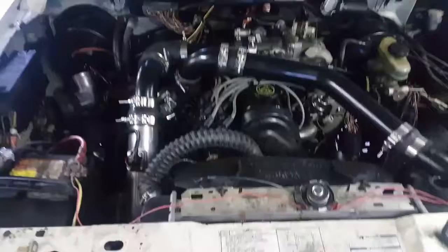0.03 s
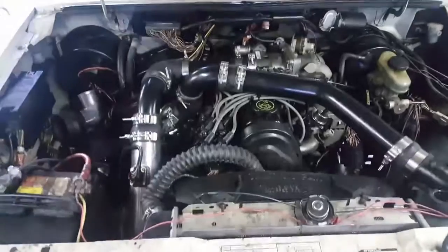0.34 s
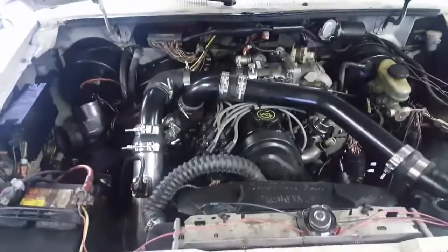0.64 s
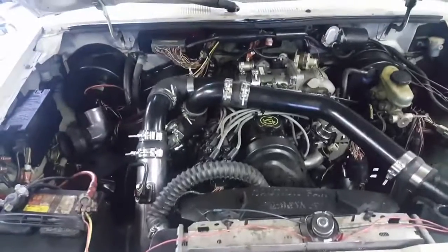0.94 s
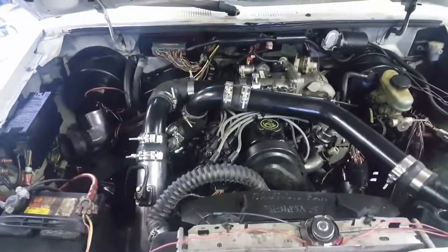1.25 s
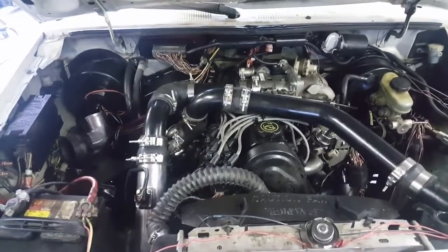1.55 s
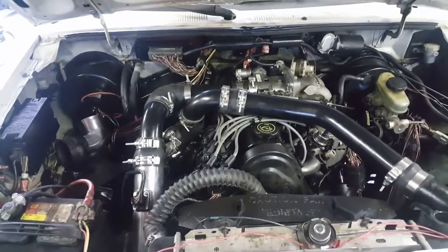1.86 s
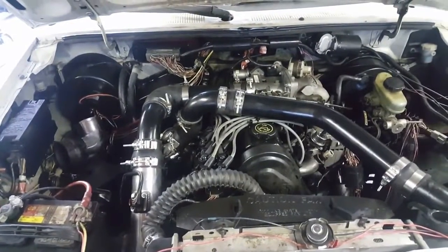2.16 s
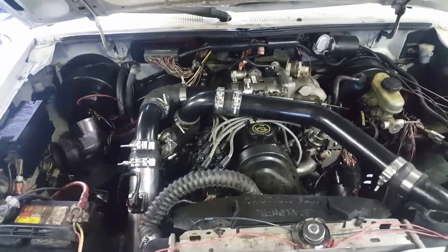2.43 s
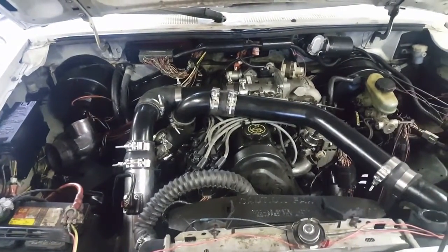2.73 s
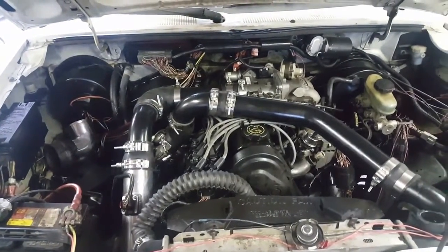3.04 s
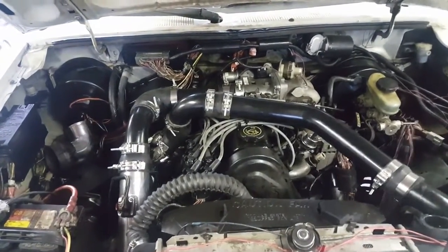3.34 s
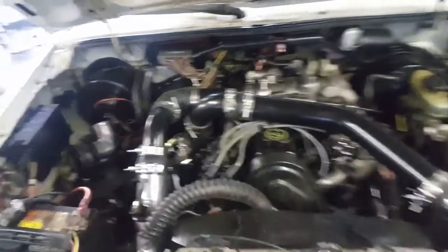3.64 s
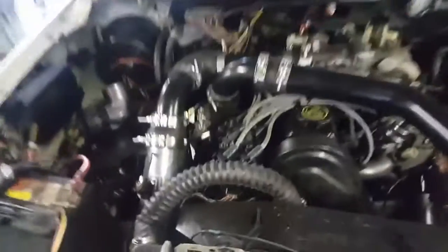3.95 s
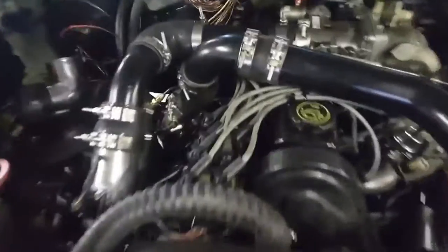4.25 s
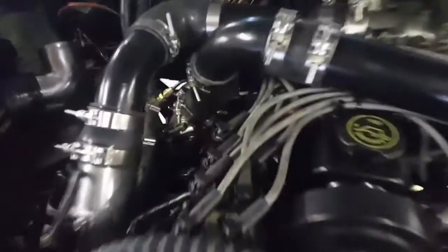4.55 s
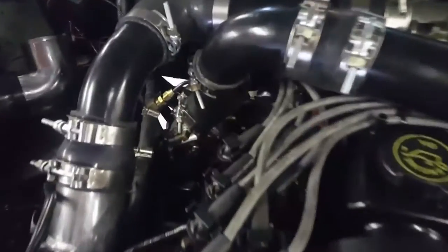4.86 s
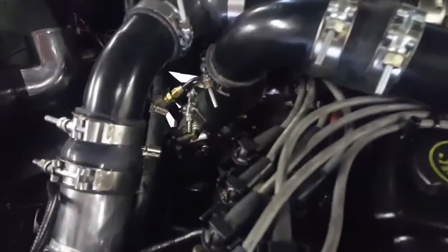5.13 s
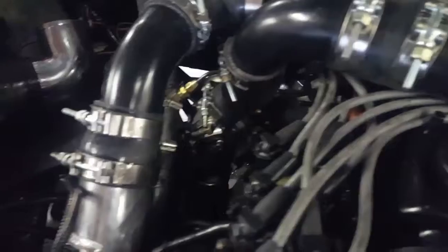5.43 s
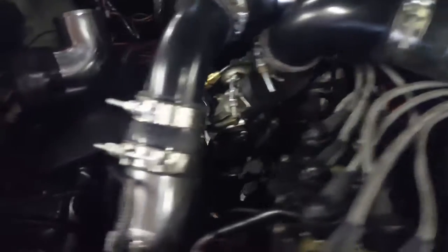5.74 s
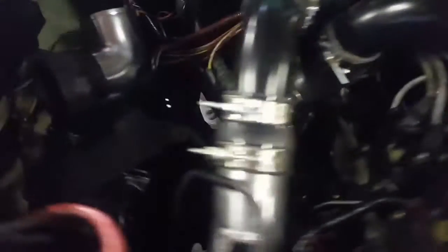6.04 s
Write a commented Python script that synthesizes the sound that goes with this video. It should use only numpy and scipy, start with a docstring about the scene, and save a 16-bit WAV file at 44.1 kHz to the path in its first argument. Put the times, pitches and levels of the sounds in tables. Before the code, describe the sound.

A rough four-cylinder car engine idles in a garage with a booming, loping exhaust and ticking clatter, its revs rising slightly late on.

```python
"""The exhaust of a rough-running four-cylinder engine booms as its idle speed hunts in a garage.
Periodic gas pulses sound mainly the 2nd and 3rd harmonics of the firing rate and lope at each misfire.
Each firing puffs gas and rings the block and the open bay, while the valves tick. One cylinder is weak,
and after a miss the next catches with a chuff. Late on the revs rise and the microphone leans in,
so that the clatter takes on the resonances heard close above the engine."""
import sys
import numpy as np
from scipy import signal
from scipy.fft import rfft, irfft
from scipy.io import wavfile
from scipy.ndimage import uniform_filter1d, minimum_filter1d

SR = 44100
rng = np.random.default_rng(int(sys.argv[2]) if len(sys.argv) > 2 else 0)


def put_to_file(sound):
    """Save the sound as 16-bit audio at rate SR, in the file named by the first command-line argument."""
    columns = np.atleast_2d(sound).T  # one column per channel
    safe = np.clip(columns, -1, 1)
    whole_steps = np.round(safe * 32767)
    wavfile.write(sys.argv[1], SR, whole_steps.astype(np.int16))


N = 268569
TIME = np.arange(N) / SR
RESPONSE_SIZE = 2 ** 14  # samples in an impulse response
IDLE_HZ = 41

# firings that catch after a miss: (time [s], relative chuff level [dB])
CATCH_EVENTS = [(0.636, -28.5), (0.736, -24), (0.855, -31), (1.014, -26), (1.083, -19), (1.1308, -23),
                (1.3382, -21), (1.481, -20), (1.5738, -26), (1.6752, -21.5), (1.7309, -20.5), (1.8019, -25),
                (1.8782, -25), (1.948, -21.5), (2.1, -20.5), (2.178, -20), (2.303, -21.5), (2.473, -19),
                (3.2114, -32), (3.3069, -25.5), (3.5775, -25), (3.6913, -23.5), (3.7655, -24),
                (3.8823, -21.5), (3.9585, -26), (4.0294, -21.5), (4.215, -22), (4.3268, -21.5),
                (4.395, -24), (4.6538, -25), (5.472, -26), (5.9, -24)]
CATCH_S, CATCH_DB = np.transpose(CATCH_EVENTS)


def undb(db):
    """Decibel law: 20 dB is a tenfold amplitude."""
    return 10 ** (np.asarray(db) / 20)


def unit(x):
    """Normalisation to an rms of 1."""
    return x / np.sqrt(np.mean(x ** 2))


def curves(table):
    """Linear interpolation of each column of a time table to every sample."""
    times, *columns = np.transpose(table)
    return [np.interp(TIME, times, column) for column in columns]


def through(x, response):
    """Convolution: a linear system answers each sample with its impulse response."""
    return signal.fftconvolve(np.atleast_2d(x), np.atleast_2d(response), axes=-1)[:, :N]


def colour(hz, db):
    """Minimum phase: folding the cepstrum gives a causal response with the given spectrum."""
    bins_hz = np.fft.rfftfreq(RESPONSE_SIZE, 1 / SR)
    gain = undb(np.interp(np.log(bins_hz + 1), np.log(hz), db))
    cepstrum = irfft(np.log(gain))
    cepstrum[1:RESPONSE_SIZE // 2] *= 2
    cepstrum[RESPONSE_SIZE // 2 + 1:] = 0
    return irfft(np.exp(rfft(cepstrum)))


def ring(modes):
    """Modal superposition: damped sinusoids sum to an impulse response of energy 1."""
    t = TIME[:RESPONSE_SIZE]
    response = sum((-1) ** k * undb(db) * width * np.exp(-np.pi * width * t) * np.sin(2 * np.pi * hz * t)
                   for k, (hz, width, db) in enumerate(modes))
    return response / np.linalg.norm(response)


def strikes(times, sizes):
    """Impulse train: each brief blow is idealised as one sample."""
    return np.bincount(np.clip(times * SR, 0, N - 1).astype(int), sizes, N)


def bursts(times, sizes, rise_s, decay_s):
    """Incoherent addition: overlapping bursts add in power to form one envelope."""
    t = TIME[:RESPONSE_SIZE]
    shape = (1 - np.exp(-t / rise_s)) * np.exp(-t / decay_s)
    power = through(strikes(times, sizes ** 2), (shape / shape.max()) ** 2)[0]
    return np.sqrt(np.abs(power))


def incoherence(hz, half_hz=1400):
    """Spatial coherence: the share of power unrelated at the two microphone ports grows with pitch."""
    return hz ** 2 / (hz ** 2 + half_hz ** 2)


def port_noise(size):
    """Partially coherent noise: alike at both ports in the bass, unrelated in the treble."""
    apart = incoherence(np.fft.rfftfreq(size, 1 / SR))
    spectra = rfft(rng.standard_normal((2, size)))
    mid, side = irfft(spectra * np.sqrt([2 - apart, apart]), size)
    return unit(np.array([mid + side, mid - side]))


def garage(x, wet_db, t60_s=0.65):
    """Reverberation: an exponentially decaying diffuse tail follows the direct sound."""
    t = TIME[:RESPONSE_SIZE]
    tail = port_noise(RESPONSE_SIZE) * np.exp(-np.log(1000) * t / t60_s) * (t > .002)
    tail *= undb(wet_db) / np.linalg.norm(tail[0])
    return (x + through(x, tail)) / np.hypot(1, undb(wet_db))


def crank_times(phase, per_firing):
    """Phase locking: events fall where the crank passes evenly spaced marks."""
    return TIME[1:][np.diff(np.floor(phase * per_firing)) > 0]


def combustion(times, miss_s=.045, miss_db=-8):
    """Misfire: the strength of combustion drops just before each catch."""
    until_catch = CATCH_S - times[:, None]
    missed = np.any((until_catch > 0) & (until_catch < miss_s), axis=1)
    return undb(miss_db * missed)


def firing_sizes(firings, scatter_db):
    """Cyclic variation: cylinder, misses and chance set each firing; a catch restarts the order."""
    # cylinders in firing order, from the one that catches to the weak one: (relative level [dB])
    cylinders = [3, 1.5, -.5, -1.5]
    caught = np.append(0, np.searchsorted(firings, CATCH_S - .5 / IDLE_HZ))
    number = np.arange(len(firings))
    since_catch = number - caught[np.searchsorted(caught, number, side="right") - 1]
    cylinder_db = np.array(cylinders)[since_catch % len(cylinders)]
    return combustion(firings) * undb(cylinder_db + scatter_db * rng.standard_normal(len(firings)))


def clatter(times, sizes, tilt_db_per_octave):
    """Modal excitation: each blow lands elsewhere, favouring other modes; hard contact is brighter."""
    # modes of block and bay from the front: (frequency [Hz], bandwidth [Hz], relative level [dB])
    far_modes = [(305, 29, -3), (342.2, 22, 1), (377.2, 29, -4.5), (518, 25, -13), (569.5, 16, 1.5),
                 (581, 23, -10), (794.6, 24, -1), (996, 77, -12.5), (1033, 26, -0.5), (1077.5, 13.4, -2),
                 (1130, 65, -11), (1430, 37, -4), (1672, 74, -9.5), (1818, 26.5, -3.5), (2138, 32, -10),
                 (2520, 72, -18), (3460, 130, -33.5), (5050, 98, -32)]
    # modes from close above the engine: (frequency [Hz], bandwidth [Hz], relative level [dB])
    near_modes = [(316.5, 44, -0.5), (387, 37, 0.5), (510, 44, 4.5), (588, 45, 1), (622, 27, 5),
                  (826, 21, 5), (1076, 62, -4), (1268, 27, 2.5), (1448, 65, 1.5), (1913, 35, -8),
                  (2154, 48, -10), (2860, 170, -50), (3600, 220, -24.5)]
    # how far the microphone leans in: (time [s], share of the near modes [0-1])
    leaning = [(3.8, 0.01), (4.7, 1)]
    nearness = np.interp(times, *np.transpose(leaning))
    ringing = np.zeros((2, N))
    for modes, share in ((far_modes, 1 - nearness), (near_modes, nearness)):
        hz, widths, db = np.transpose(modes)
        gains = undb(db + tilt_db_per_octave * np.log2(hz / 1000)) * widths
        for f, width, gain in zip(hz, widths, gains / np.linalg.norm(gains)):
            common, *own = rng.standard_normal((len(times), 3)).T
            coupling = np.sqrt(1 - incoherence(f)) * common + np.sqrt(incoherence(f)) * np.array(own)
            pushes = coupling * sizes * np.sqrt(share)
            train = np.array([strikes(times, push) for push in pushes]) + 1e-18
            radius, angle = np.exp(-np.pi * width / SR), 2 * np.pi * f / SR
            feedback = [1, -2 * radius * np.cos(angle), radius ** 2]
            ringing += signal.lfilter([gain * np.sin(angle)], feedback, train)
    return ringing


def gas(firings, hiss_db):
    """Amplitude-modulated noise: escaping gas puffs at each firing and chuffs longer at each catch."""
    # spectrum of the escaping gas: (frequency [Hz], relative level [dB])
    spectrum = [(200, -24), (500, 7), (1000, 12), (2000, 4.5), (2800, 1.5), (4300, -5), (5100, -6),
                (5700, -7.5), (8000, -9.5), (9300, -7), (10500, -13.5), (15500, -15)]
    sizes = firing_sizes(firings, scatter_db=2.05)
    puffs = unit(bursts(firings, sizes, rise_s=0.002, decay_s=0.025)) * undb(hiss_db + 9.5)
    chuffs = bursts(CATCH_S, undb(CATCH_DB - 6.5), rise_s=0.00081, decay_s=0.029)
    hiss = unit(through(port_noise(N), colour(*np.transpose(spectrum))))
    return garage(hiss * np.hypot(puffs, chuffs), wet_db=-3.5)


def valves(phase, rattle_db, lag_s=.004, jitter_s=0.001532, scatter_db=3.2):
    """Impact sound: two valves close per firing, each ringing the bay with a bright tick."""
    times = crank_times(phase, per_firing=2)
    timing, force = rng.standard_normal((len(times), 2)).T
    sizes = combustion(times) * undb(scatter_db * force)
    ticks = clatter(times + lag_s + jitter_s * timing, sizes, tilt_db_per_octave=2.1)
    return garage(unit(ticks) * undb(rattle_db - 5.5), wet_db=-0.5)


def block(firings, rattle_db):
    """Structure-borne sound: each firing clacks and scrapes in the block; at times it knocks hard."""
    # hard knocks of the block: (time [s], relative level [dB])
    hard_knocks = [(0.496, -15.5), (0.637, -17.5), (0.735, -12.5), (0.876, -13), (1.054, -17), (1.078, -13),
                   (1.266, -14.5), (1.289, -13.5), (1.357, -11), (1.406, -25.5), (1.803, -12.5),
                   (1.878, -14.5), (2.098, -14), (2.176, -10.5), (2.473, -13), (3.763, -20), (3.952, -14.5),
                   (4.029, -11), (4.211, -18.5), (4.463, -17), (4.53, -21), (5.273, -14), (5.347, -19),
                   (5.47, -14.5), (5.56, -20), (5.613, -15), (5.825, -14.5), (5.845, -10), (5.899, -15),
                   (5.974, -17)]
    sizes = firing_sizes(firings, scatter_db=2.5)
    clacks = unit(clatter(firings, sizes, tilt_db_per_octave=-1.5)) * undb(rattle_db - 6.5)
    band = signal.butter(2, [330, 1500], "band", fs=SR, output="sos")
    envelope = bursts(firings, sizes, rise_s=0.00095, decay_s=0.0057)
    scrape = unit(signal.sosfilt(band, envelope * port_noise(N))) * undb(rattle_db - 14.5)
    knock_s, knock_db = np.transpose(hard_knocks)
    knocks = clatter(knock_s, undb(knock_db - 1.0), tilt_db_per_octave=1.8)
    return garage(clacks + scrape + knocks, wet_db=-3)


def pipe_thumps(firings, jitter_s=0.002):
    """Pipe resonance: the unevenness of the firings sets the exhaust's modes ringing."""
    # modes of the exhaust pipe: (frequency [Hz], bandwidth [Hz], relative level [dB])
    pipe_modes = [(68.5, 34.5, -0.5), (97, 9.9, 1), (137, 17, 2.5), (161.4, 48.7, -5.5), (216, 49, -14)]
    timing, force = rng.standard_normal((len(firings), 2)).T
    pulses = strikes(firings + jitter_s * timing, np.tanh(2 * force))
    band = signal.butter(3, [68, 270], "band", fs=SR, output="sos")
    return unit(signal.sosfilt(band, through(pulses, ring(pipe_modes))[0]))


def pipe_boom(phase, firing_hz):
    """Source and filter: firing harmonics slide through peaks and dips, at constant total power."""
    # harmonics 1 to 4 of an exhaust pulse: (relative level [dB])
    harmonics = [1, 1.5, 0.5, -9]
    # transfer function of exhaust and garage: (frequency [Hz], gain [dB])
    transfer = [(40, -28.5), (50, -36.5), (57, -17.5), (79, -7.5), (87, -16), (98, -9), (112, -4),
                (118, -23.5), (124, -12), (131, -7), (140, -8), (147, -28), (153, -9.5), (162, -10),
                (170, -21.5), (215, -25.5)]
    gains = [undb(db + np.interp(k * firing_hz, *np.transpose(transfer)))
             for k, db in enumerate(harmonics, 1)]
    tone = sum(gain * np.cos(2 * np.pi * k * phase) for k, gain in enumerate(gains, 1))
    return tone * np.sqrt(2) / np.linalg.norm(gains, axis=0)


def exhaust(phase, firing_hz, boom_db, firings):
    """Amplitude modulation: around each miss the boom sags and the thumps swell, so the engine lopes."""
    lope_db, lope_db_per_hz = -15, -0.02  # thumps against boom at smooth idle; they settle as revs rise
    stumble_db, stumble_s = 13, 0.063  # their swell around each catch
    sag = np.interp(TIME, firings, combustion(firings, miss_s=0.025, miss_db=-2.5))
    from_catch_s = np.abs(firings[:, None] - CATCH_S).min(axis=1)
    stumble = np.interp(TIME, firings, np.exp(-(from_catch_s / stumble_s) ** 2))
    lope = undb(lope_db + lope_db_per_hz * (firing_hz - IDLE_HZ) + stumble_db * stumble)
    loping = pipe_boom(phase, firing_hz) * sag + pipe_thumps(firings) * lope
    return loping / np.hypot(1, lope) * undb(boom_db - 0.46)


def scene():
    """Superposition: one crank drives exhaust, block, valves and gas, and their pressures add."""
    # speed of the hunting crank: (time [s], firing rate [Hz])
    speed = [(0.44, 41.44), (0.55, 43.14), (1.0, 40.78), (1.07, 37.79), (1.24, 45.64), (1.7, 38.66),
             (1.82, 41.64), (2.34, 40.95), (2.47, 35.96), (2.65, 45.46), (2.8, 46.6), (3.14, 46.69),
             (3.41, 42.8), (3.64, 43.96), (3.88, 41.38), (4.23, 44.32), (4.4, 43.36), (4.84, 53.5),
             (5.31, 53.99), (5.45, 57), (5.8, 55.85), (6.08, 51.35)]
    # relative strength of the firings: (time [s], gas hiss [dB], rattle [dB], exhaust boom [dB])
    load = [(0.66, -45, -29, -13), (0.78, -42, -24.5, -10.5), (1.05, -46, -26.5, -13.5),
            (1.1, -38.5, -25, -10), (1.34, -44.5, -25, -7.5), (1.73, -44, -24, -11.5),
            (1.79, -36.5, -23, -9), (2.0, -45, -27, -9.5), (2.21, -41.5, -23, -11), (2.44, -56, -34, -17),
            (2.5, -37.5, -23.5, -11.5), (2.77, -44.5, -24, -6.5), (2.91, -46, -29, -9.5),
            (3.83, -43, -26.5, -10), (4.06, -40.5, -28, -8), (4.25, -47.5, -27.5, -9.5),
            (4.89, -44, -25, -7), (5.14, -46.5, -29.5, -7.5), (5.61, -41, -22.5, -11),
            (5.79, -43, -24.5, -7), (6.05, -50, -29.5, -8.5), (6.08, -52.5, -26, -14)]
    firing_hz, = curves(speed)
    hiss_db, rattle_db, boom_db = curves(load)
    phase = np.cumsum(firing_hz) / SR  # one cycle per firing
    firings = crank_times(phase, per_firing=1)
    return (exhaust(phase, firing_hz, boom_db, firings) + block(firings, rattle_db)
            + valves(phase, rattle_db) + gas(firings, hiss_db))


def limit(x, ceiling, window):
    """Peak limiting: the gain dips smoothly around peaks that pass the ceiling."""
    gain = ceiling / np.maximum(np.abs(x).max(axis=0), ceiling)
    return x * uniform_filter1d(minimum_filter1d(gain, window), window)


def record(dry):
    """Frequency response: the sound fades in, is coloured by each port, limited and low-passed."""
    # microphone ports, the right much duller: (frequency [Hz], left gain [dB], right gain [dB])
    ports = [(160, 1, 1), (343, 7, 5.5), (640, 3, 1), (1390, 1, -2), (2680, 4, -4), (3900, 4.5, -5.5),
             (4600, 4.5, -9.5), (7140, 6, -16.5), (9400, 7, -30), (12800, 6, -14)]
    start_s, fade_s, cutoff_hz = .44, 0.2, 15650
    hz, left_db, right_db = np.transpose(ports)
    fade_in = np.clip((TIME - start_s) / fade_s, 0, 1)
    heard = through(dry * fade_in, np.array([colour(hz, left_db), colour(hz, right_db)]))
    heard = limit(heard, ceiling=.97, window=400)
    return signal.sosfilt(signal.ellip(12, .1, 80, cutoff_hz, fs=SR, output="sos"), heard)


dry = scene()
out = record(dry)
put_to_file(out)
```